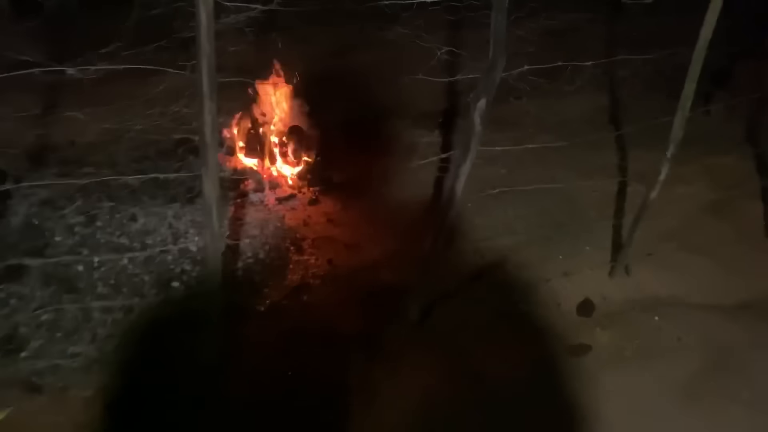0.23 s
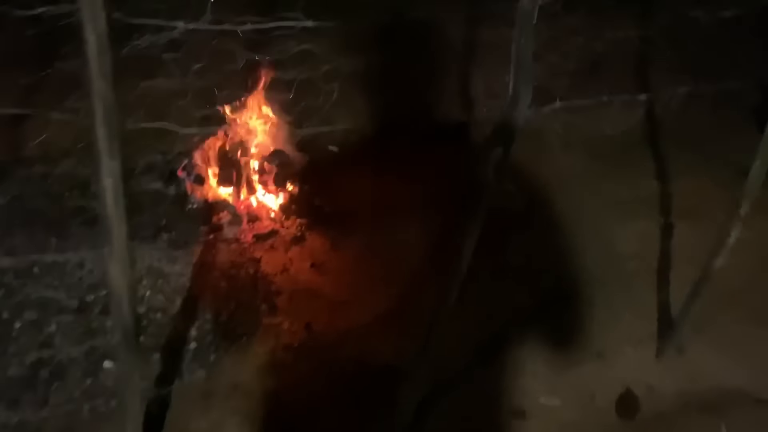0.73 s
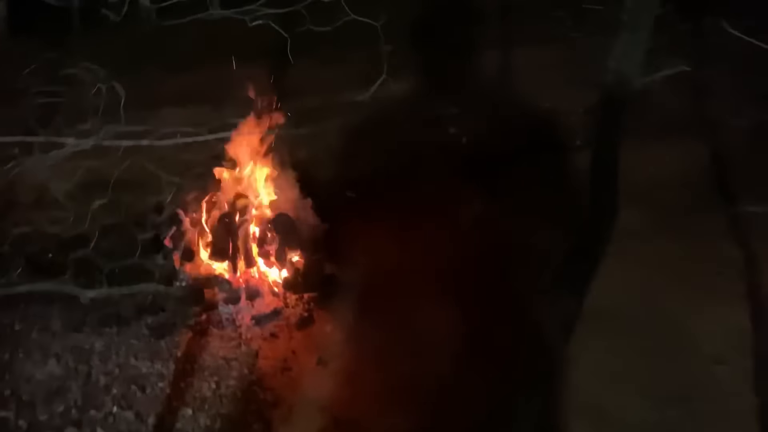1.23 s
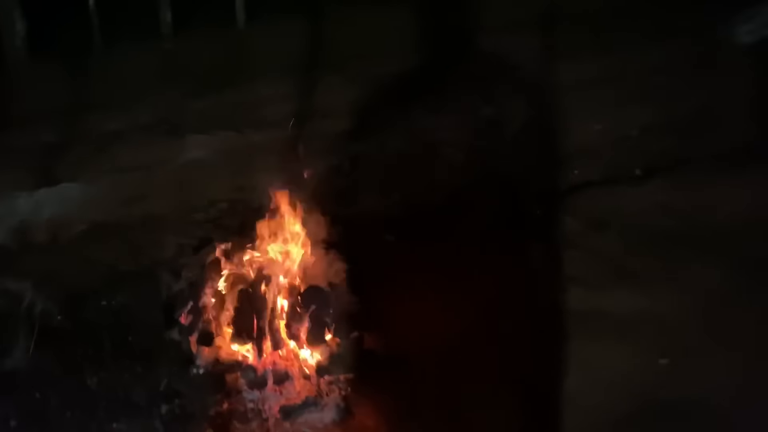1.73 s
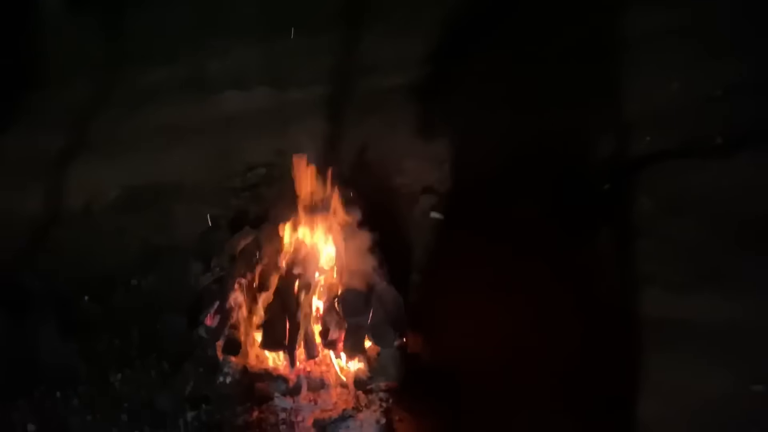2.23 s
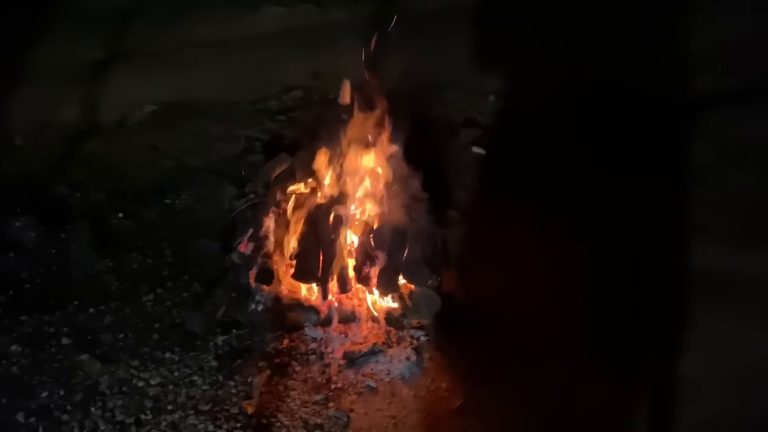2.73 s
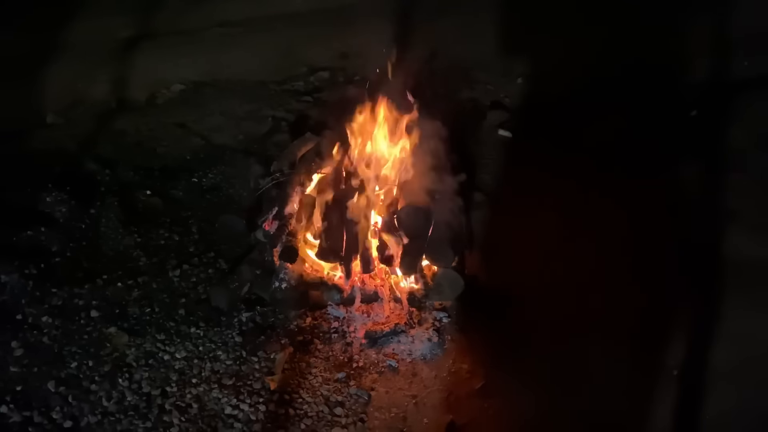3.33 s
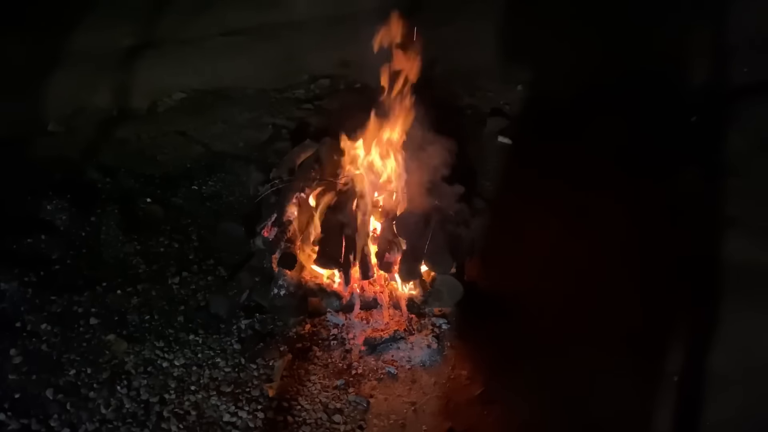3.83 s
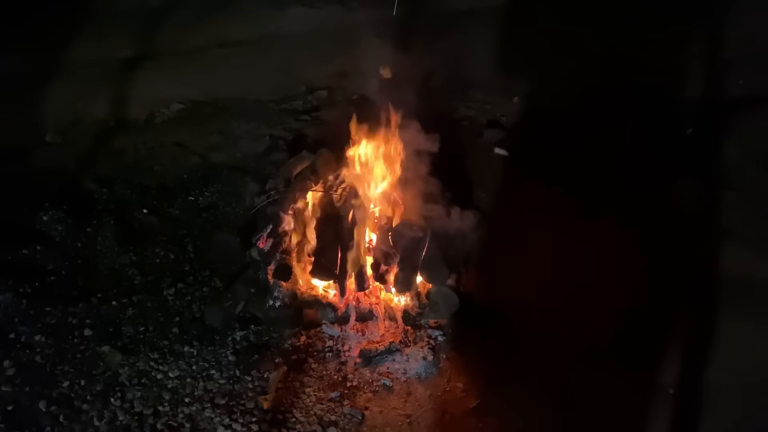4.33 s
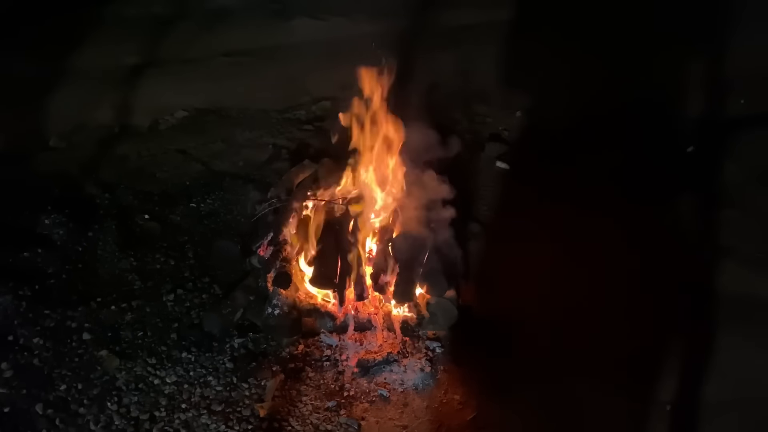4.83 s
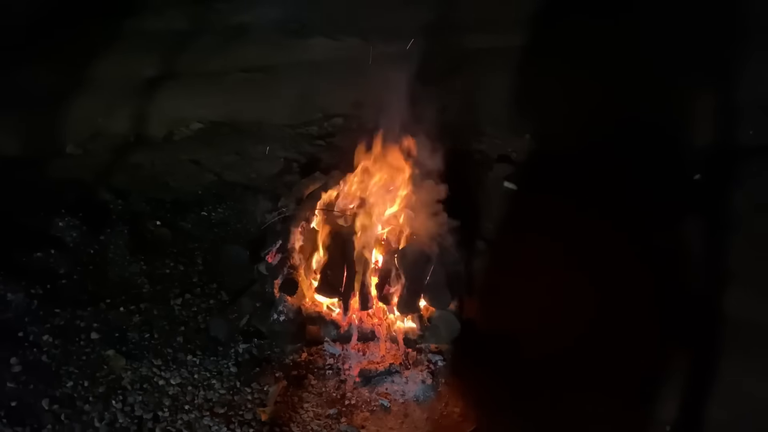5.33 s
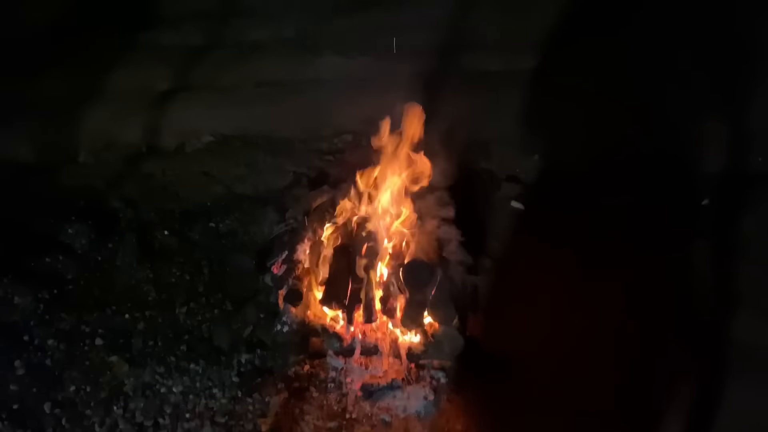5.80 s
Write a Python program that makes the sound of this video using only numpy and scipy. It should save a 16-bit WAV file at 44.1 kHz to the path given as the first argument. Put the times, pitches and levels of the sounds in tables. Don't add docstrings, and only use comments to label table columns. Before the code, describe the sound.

Night outdoors, close to a wood bonfire, heard in stereo through a handheld microphone. From 0 s small pops and crisp snaps come irregularly over a soft, uneven flame rumble and faint sap hiss, which flares briefly near 0.1 and 0.8 s. A shrill cicada chorus around 6 kHz is constant; a nearer one swells in at about 0.6 s and holds, leaning left, while another comes forward near 1.7 and 2.9 s. Very faint, higher, a bush cricket throbs twice a second over a smooth trill. Embers slide at 1.4 s; a stronger crack snaps at 1.9 s. From 2.85 to 3.35 s low, muffled handling bumps knock the microphone. A crack follows at 3.4 s, then the loudest bursts at 4.2, 4.65 and 4.8 s, with smaller ones between and at 5.0 s, each with a short diffuse tail. Sparse light ticks follow until a last loud crack at 6.0 s.

```python
import sys
import numpy as np
from scipy import signal
from scipy.fft import rfft, irfft, next_fast_len
from scipy.io import wavfile

SR = 44100
rng = np.random.default_rng(int(sys.argv[2]) if len(sys.argv) > 2 else 0)


def file_out(sig):
    cols = np.atleast_2d(sig).T
    lim = np.clip(cols, -1, 1)
    pcm = np.round(lim * 32767).astype(np.int16)
    wavfile.write(sys.argv[1], SR, pcm)


def attenuation_scalar(level_db):
    decades = np.asarray(level_db, float) / 20
    return 10 ** decades


N = 267466
SLOW_STEP = 40

# (time [s], peak [dB], pitch [Hz], thump [dB re peak], sizzle [dB re peak])
BANGS = [(0.162, -25, 2030, -14, -1), (0.473, -26.5, 2270, -18.5, -5), (0.704, -28.5, 670, -2, -0.5),
         (0.901, -24.5, 2350, -20, 9.5), (1.068, -28.5, 2380, -8, -15), (1.904, -17, 3870, -26, -0.5),
         (2.678, -29.5, 4100, -15, 3), (2.936, -25, 3860, -17, -2.5), (3.432, -18, 2040, -16.5, -6),
         (3.526, -30.5, 2030, -21, 2.5), (4.188, -9.5, 2310, -20.5, -4), (4.3, -18.5, 3380, -19.5, 1.5),
         (4.436, -23.5, 3600, -16, 3.5), (4.66, -10.5, 2460, -21.5, -4), (4.815, -11, 2470, -20, -6),
         (4.881, -28, 1880, -3, -1), (4.932, -27.5, 2430, -4, -11), (5, -16, 3420, -20, -1),
         (6.01, -10.5, 2820, -11.5, -13.5)]
BANG_HOLLOW_DB, HOLLOW_FOLLOWS_THUMP = -4, 0.64
# (time [s], peak [dB], pitch [Hz], sizzle [dB re peak])
SNAPS = [(0.027, -35.5, 2370, 4.5), (0.142, -39.5, 1630, 7), (0.743, -28, 1500, -8),
         (1.267, -31, 2480, -1.5), (1.367, -30, 4800, -29), (1.373, -22.5, 2360, -3.5),
         (1.533, -37, 1910, -1.5), (1.942, -38, 4480, 9.5), (2.115, -33.5, 1480, 1),
         (2.237, -31.5, 1870, 5), (2.404, -44, 4500, -13), (2.446, -42, 4520, -6), (2.49, -32, 1970, -2.5),
         (2.658, -40, 3900, -14), (2.872, -41, 497, 12), (3.221, -39.5, 4650, 1), (3.313, -34, 2340, 4),
         (3.398, -37, 3100, 11), (3.573, -37, 4440, 3), (3.619, -37, 3670, 3), (4.56, -38, 3850, 7),
         (5.296, -40.5, 3820, -1), (5.399, -32, 4250, -1), (5.772, -40.5, 4600, 6), (5.784, -37.5, 4500, 1),
         (5.886, -42, 4660, -9)]
SNAP_THUMP_DB, SNAP_HOLLOW_DB = -21, -18
# (time [s], peak [dB], pitch [Hz], thump [dB re peak])
THUDS = [(0.299, -32, 800, -10.5), (0.639, -49, 840, -8), (0.683, -45, 500, -1), (0.771, -37, 1650, -9),
         (0.806, -37.5, 3300, -9), (0.821, -36, 1930, -4.5), (1.111, -43, 1650, 1.5), (1.567, -40, 970, -4),
         (1.732, -42.5, 4630, 6.5), (1.796, -33, 2580, -8), (1.887, -53, 520, 10), (2.007, -33, 1510, -13),
         (3.103, -33, 3700, -3), (3.504, -36, 1330, -1.5), (3.944, -43, 1080, 6), (5.15, -48, 1260, 9.5),
         (5.619, -44, 4670, -1.1), (5.733, -46, 4680, 4.5), (5.823, -46, 2660, -9)]
THUD_HOLLOW_DB, THUD_SIZZLE_DB = -11.5, -13


def all_pops():
    rows = []
    for s, db, hz, thump_db, sizzle_db in BANGS:
        hollow_db = BANG_HOLLOW_DB + HOLLOW_FOLLOWS_THUMP * thump_db
        rows.append((s, db, hz, thump_db, hollow_db, sizzle_db))
    for s, db, hz, sizzle_db in SNAPS:
        rows.append((s, db, hz, SNAP_THUMP_DB, SNAP_HOLLOW_DB, sizzle_db))
    for s, db, hz, thump_db in THUDS:
        rows.append((s, db, hz, thump_db, THUD_HOLLOW_DB, THUD_SIZZLE_DB))
    return sorted(rows)


# (frequency [Hz], width [Hz], level [dB])
POP_BODY = [
    (2286, 1270, 4.5),
    (3420, 710, 6.5),
    (5940, 2330, 9.5),
]
GROUND_ECHO_S = .00087
LEAN = 0.45


def pop(pitch_hz, thump_db, hollow_db, sizzle_db):
    t = np.arange(2048) / SR
    decay = np.exp(-t / .002) + attenuation_scalar(-22) * np.exp(-t / .008)
    shape = (1 - np.exp(-t / .0003)) * decay
    lines = rfft(shape * rng.standard_normal(len(t)))
    burst = irfft(lines / np.abs(lines)) * np.minimum(4 * shape ** .5, 1)
    hollow = peak_one(band_twice(burst, 950, 1750))
    burst = burst + .8 * np.roll(burst, round(GROUND_ECHO_S * SR))
    body = 0
    for k, (hz, width_hz, db) in enumerate(POP_BODY):
        body = body + (-1) ** k * attenuation_scalar(db) * resonance(burst, hz, width_hz)
    note = band(burst, .75 * pitch_hz, 1.3 * pitch_hz)
    crack = peak_one(peak_one(band_twice(body, 1660, 7500)) + 0.92 * peak_one(note))
    sizzle = peak_one(band_twice(burst, 7800, 11800) + attenuation_scalar(-12) * band(burst, 12800, 15900))
    sharp = crack + attenuation_scalar(hollow_db + 2.5) * hollow + attenuation_scalar(sizzle_db - 7) * sizzle
    turned = rng.uniform(.5, 1.1) * np.imag(signal.hilbert(sharp))
    puff = np.gradient(np.exp(-((t - .005) / 0.00081) ** 2))
    thump = attenuation_scalar(thump_db - 0.5) * peak_one(band(puff, 170, 377))
    leaning = LEAN * attenuation_scalar(hollow_db) * hollow * [[1], [-1]]
    return thump + sharp + turned * [[-1], [1]] + leaning


WASH_T60_S, WASH_RISE_S, WASH_DB = 0.32, 0.00033, -13.5


def wash(power, low_hz, high_hz):
    fall = attenuation_scalar(-120 / (WASH_T60_S * SR))
    rise = np.exp(-1 / (WASH_RISE_S * SR))
    envelope = signal.lfilter([1 - rise], np.convolve([1, -fall], [1, -rise]), power + 1e-18)
    return np.sqrt(np.maximum(envelope, 0)) * band(rng.standard_normal((2, N)), low_hz, high_hz)


def pops():
    out, power = np.zeros((2, N + 2048)), np.zeros((3, N))
    for s, peak_db, hz, thump_db, hollow_db, sizzle_db in all_pops():
        at = round((s + .0008) * SR)
        out[:, at:at + 2048] += attenuation_scalar(peak_db + 1.5) * pop(hz, thump_db, hollow_db, sizzle_db)
        wash_db = peak_db + WASH_DB + np.array([hollow_db + 11.0, 0, sizzle_db])
        power[:, at] = attenuation_scalar(wash_db) ** 2
    low = panned(wash(power[0], 300, 1180), 1.8)
    middle = band(wash(power[1], 1820, 6000), 1030, 6700)
    bright = band_twice(wash(power[2], 7530, 11000), 6000, 11900)
    return out[:, :N] + low + middle + bright


# (frequency [Hz], density [dB per Hz])
RUMBLE = [(18, -37), (32, -19), (50, -6.5), (72, 3.5), (95, -4.5), (150, -9.5), (240, -16), (380, -25.5),
          (520, -74)]
# (time [s], level
# [dB])
DRAUGHT = [(0, -50.5), (.5, -47), (1.43, -48.5), (2.04, -43.5), (2.2, -47), (2.46, -46.5), (2.79, -47.5),
           (2.99, -39), (3.5, -44.5), (3.66, -49), (4.5, -46), (5.5, -47.5), (6.06, -47)]


def draught_rumble():
    rumble_db, = in_time(DRAUGHT)
    rumble = banded_noise(RUMBLE, 50, 350, count=5, patchy_db=1.5, flicker=12)
    return attenuation_scalar(rumble_db + 3.0) * panned(rumble, -3.0)


# (frequency [Hz], density [dB per Hz])
HISS = [(180, -34), (300, -3), (555, -6), (914, -10), (1830, -9), (2630, -8), (3050, -10), (4030, -9.5),
        (4800, -4), (6240, -11), (10600, -120)]
# (time of the top [s], level [dB], half length [s])
FLARES = [
    (0.12, -54, 0.18),
    (0.844, -52.5, 0.14),
    (1.433, -61, 0.16),
    (2.07, -55.5, 0.15),
    (3.54, -60, 0.063),
    (4.482, -59, 0.11),
    (4.904, -52, 0.034),
]
HISS_REST_DB = -61


def sap_hiss():
    hiss = banded_noise(HISS, 400, 4500, count=6, patchy_db=2, flicker=16)
    born = rng.random(N) < 40 / SR
    size_db = 4 * np.minimum(rng.exponential(1, N), 3)
    ticks = born * attenuation_scalar(size_db) * rng.choice([-1, 1], N)
    ticks = rms_one(band_twice(ticks + 1e-18, 900, 4500))
    ticks = np.array([ticks, np.roll(ticks, 6)])
    flares = [(s, db - 5.5, half) for s, db, half in FLARES]
    return attenuation_scalar(3.08) * swells(HISS_REST_DB, flares, order=2) * (hiss + attenuation_scalar(-12) * ticks)


# (time [s], level [dB], half length [s], centre [Hz])
RUSTLES = [
    (0.646, -49.5, 0.0071, 840),
    (1.378, -40.5, 0.034, 2180),
    (1.587, -55.5, 0.035, 925),
    (2.099, -53, 0.18, 1810),
    (3.856, -53.5, 0.068, 644),
]


def rustles():
    t, out = np.arange(N) / SR, np.zeros((2, N))
    for s, db, half, hz in RUSTLES:
        near = abs(t - s) < 3 * half
        grains = rng.uniform(.3, 1.7, N // 88 + 1).repeat(88)
        grit = rng.standard_normal((2, N))[:, near] * grains[:near.sum()]
        swell = np.exp(-((t[near] - s) / half) ** 2)
        out[:, near] += attenuation_scalar(db) * swell * rms_one(band(grit, 0.64 * hz, 1.2 * hz))
    return out


# (frequency [Hz], level [dB])
TYMBAL = [(4400, -48), (4950, -27), (5350, -20), (5630, -8), (5910, -3), (6200, 0), (6480, -7), (6760, -21),
          (6950, -38), (7200, -80)]


def cicada(rate, orders, size, odd_db):
    turn = 2 * np.pi * np.cumsum(in_time(rate)[0]) / SR
    mean_rate = np.mean(rate, axis=0)[1]
    out = np.zeros((2, N))
    for k in orders:
        level_db = at_hz(TYMBAL, k * mean_rate * size) + odd_db * (k % 2)
        for side in out:
            fade = attenuation_scalar(level_db + 2 * drift(2.5))
            slip = rng.uniform(0, 7) + .3 * drift(3)
            side += spread(fade) * np.cos(k * turn + spread(slip))
    return rms_one(out) * np.sqrt(2)


# (time [s], lead level [dB], far chorus level [dB], left minus right [dB])
SONG = [(0, -39, -43.5, 2.5), (.62, -34, -40, 4), (1.2, -36.5, -37, 3.5), (1.9, -35.5, -41.5, 3),
        (2.35, -34, -41, 5.5), (2.7, -36.5, -44.5, 3), (3.9, -33, -41.5, 2), (5.1, -35, -40, 4),
        (6.06, -36.5, -41.5, 1.5)]
LEAD_START_S, LEAD_ONSET_S, LEAD_SETTLE_S = .62, .1, .45
LEAD_CYCLES_PER_S, LEAD_RUSH, LEAD_CREEP = 140.0, 3.9, .22
WARM_UP_DB, SECOND_DB, THIRD_REST_DB = -24, -45, -49
# (time [s], rate [cycles per s])
SECOND_RATE = [(0, 135.5), (2.5, 135.75), (6.06, 135.77)]
# (time [s], rate [cycles per s])
THIRD_RATE = [(0, 142), (1.3, 142.5), (2, 143.6), (3.4, 143.5), (4.2, 142.95), (6.06, 142.3)]
# (time of the top [s], level [dB], half length [s])
THIRD_SWELLS = [
    (1.7, -44.5, 0.35),
    (2.883, -38, 0.23),
    (5.7, -49, 0.23),
]
# (frequency [Hz], density [dB per Hz])
CHORUS = [(4000, -75), (4400, -11.5), (5000, -6), (5400, 10.5), (5750, 10.5), (6050, 15), (6300, 14.5),
          (6650, -9.5), (6900, -43), (7150, -101)]


def cicadas():
    lead_db, chorus_db, pan_db = in_time(SONG)
    onset = (np.arange(N) / SR - LEAD_START_S) / LEAD_ONSET_S
    waiting_db = WARM_UP_DB * np.clip(1 - onset, 0, 1)
    sung = np.arange(0, N / SR, .05)
    rate = LEAD_CYCLES_PER_S + LEAD_RUSH * np.exp(-sung / LEAD_SETTLE_S) + LEAD_CREEP * sung
    lead_rate = np.transpose([sung + LEAD_START_S + LEAD_ONSET_S, rate])
    smear = banded_noise(TYMBAL, 5000, 6600, count=4, patchy_db=1, flicker=9)
    lead = cicada(lead_rate, range(34, 49), size=1, odd_db=-2.5) + attenuation_scalar(-12) * smear
    second = attenuation_scalar(SECOND_DB) * cicada(SECOND_RATE, range(38, 47), size=1.015, odd_db=0)
    third = cicada(THIRD_RATE, range(37, 45), size=1.03, odd_db=0)
    third = swells(THIRD_REST_DB, THIRD_SWELLS, order=2) * third
    chorus = attenuation_scalar(chorus_db) * banded_noise(CHORUS, 5000, 6600, count=4, patchy_db=1, flicker=9)
    near = attenuation_scalar(waiting_db) * (attenuation_scalar(lead_db) * lead + second)
    return panned(near + third + chorus, pan_db)


# (frequency [Hz], density [dB per Hz])
CRICKET = [(11900, -60), (12350, -12), (12800, -2), (13400, 0), (14300, -6), (15100, -10), (15400, -60)]
CRICKET_TOPS_S = [.35, .865, 1.413, 1.942, 2.423, 2.97, 3.56, 4.1, 4.587, 5.142, 5.72]
CRICKET_DB, CRICKET_REST_DB, CRICKET_FADE_DB_PER_S, CRICKET_HALF_S = -62, -72.5, -0.8, 0.11
# (frequency [Hz], density [dB per Hz])
TRILL = [(8300, -60), (8900, -12), (9600, -2), (10400, 0), (11100, -3), (11650, -9), (11950, -60)]
TRILL_DB = -66.5


def high_insects():
    tops = [(s, CRICKET_DB + CRICKET_FADE_DB_PER_S * s, CRICKET_HALF_S) for s in CRICKET_TOPS_S]
    swell = swells(CRICKET_REST_DB, tops, order=4)
    cricket = banded_noise(CRICKET, 12500, 15000, count=3, patchy_db=1.5, flicker=90)
    trill = banded_noise(TRILL, 9000, 11500, count=3, patchy_db=1, flicker=12)
    return swell * cricket + attenuation_scalar(TRILL_DB) * trill


# (time [s], peak [dB], pitch [Hz])
KNOCKS = [(2.86, -20, 109), (2.892, -27.5, 115), (2.928, -32.5, 159), (2.964, -33.5, 107), (3, -33, 86.1),
          (3.044, -17.5, 177), (3.086, -27.5, 96), (3.13, -30, 99.5), (3.168, -35, 61.9), (3.249, -34, 137),
          (3.336, -31.5, 79.6)]


def knocks():
    out, t = np.zeros(N), np.arange(SR // 8) / SR
    for s, peak_db, hz in KNOCKS:
        modes = np.sin(2 * np.pi * hz * t) + 0.41 * np.sin(2 * np.pi * 1.44 * hz * t)
        ring = t * np.exp(-t / 0.0097) * modes
        at = round(s * SR)
        out[at:at + len(t)] += attenuation_scalar(peak_db - 1.5) * peak_one(ring)
    return panned(out, -5.0)


# (frequency [Hz], correlation [-1 to 1])
LIKENESS = [(60, 0.93), (240, 0.84), (950, 0), (3770, 0.021), (15000, 0.091)]


def banded_noise(spectrum, low_hz, high_hz, count, patchy_db, flicker):
    size = next_fast_len(N)
    hz = np.maximum(np.fft.rfftfreq(size, 1 / SR), 1)
    alike = np.clip(at_hz(LIKENESS, hz), -1, 1)
    mid, side = rfft(rng.standard_normal((2, size))) * attenuation_scalar(at_hz(spectrum, hz))
    pair = np.sqrt(1 + alike) * mid + np.sqrt(1 - alike) * side * [[1], [-1]]
    place = (count - 1) * np.log(hz / low_hz) / np.log(high_hz / low_hz)
    place = np.clip(place, 0, count - 1)
    out, together = 0, drift(5.0)
    for k in range(count):
        gain = spread(attenuation_scalar(patchy_db * (.5 * together + drift(flicker))))
        share = np.maximum(1 - abs(place - k), 0)
        out = out + gain * irfft(pair * share, size)[:, :N]
    return out / np.sqrt(np.mean(out.mean(axis=0) ** 2))


def drift(rate):
    r = np.exp(-2 * np.pi * rate * SLOW_STEP / SR)
    noise = rng.standard_normal(N // SLOW_STEP + 2002)
    return rms_one(signal.lfilter([1], [1, -2 * r, r * r], noise)[2000:])


def spread(slow):
    return np.interp(np.arange(N) / SLOW_STEP, np.arange(len(slow)), slow)


def swells(rest_db, rows, order):
    t = np.arange(N) / SR
    bumps = sum(attenuation_scalar(db) * np.exp(-abs((t - s) / half) ** order) for s, db, half in rows)
    return attenuation_scalar(rest_db) + bumps


def in_time(rows):
    s, *columns = np.transpose(rows)
    return [np.interp(np.arange(N) / SR, s, c) for c in columns]


def at_hz(points, hz):
    points_hz, values = np.transpose(points)
    return np.interp(np.log(hz), np.log(points_hz), values)


def panned(x, pan_db):
    return x * np.array([attenuation_scalar(pan_db / 2), attenuation_scalar(-pan_db / 2)]).reshape(2, -1)


def resonance(x, hz, width_hz):
    r = np.exp(-np.pi * width_hz / SR)
    poles = [1, -2 * r * np.cos(2 * np.pi * hz / SR), r * r]
    return signal.lfilter(np.array([1, 0, -1]) * (1 - r * r) / 2, poles, x)


def band(x, low_hz, high_hz):
    return signal.sosfilt(signal.butter(2, [low_hz, high_hz], "band", fs=SR, output="sos"), x)


def band_twice(x, low_hz, high_hz):
    return band(band(x, low_hz, high_hz), low_hz, high_hz)


def rms_one(x):
    return x / np.sqrt(np.mean(x ** 2) + 1e-20)


def peak_one(x):
    return x / np.abs(x).max()


def scene():
    fire = pops() + draught_rumble() + sap_hiss() + rustles()
    return fire + cicadas() + high_insects() + knocks()


def band_limit(x):
    return signal.sosfilt(signal.butter(12, 16310, fs=SR, output="sos"), x)


CUTOFF_HZ = 16300


def record(dry):
    low_pass = signal.cheby2(10, 60, CUTOFF_HZ, fs=SR, output="sos")
    mix = signal.sosfilt(low_pass, dry)
    return band_limit(mix)


dry = scene()
out = record(dry)
file_out(out)
```